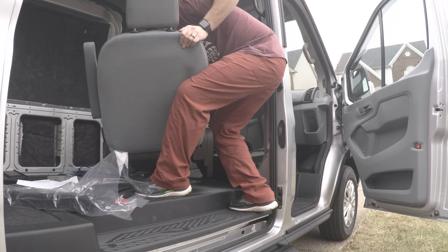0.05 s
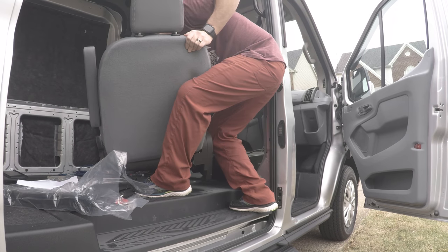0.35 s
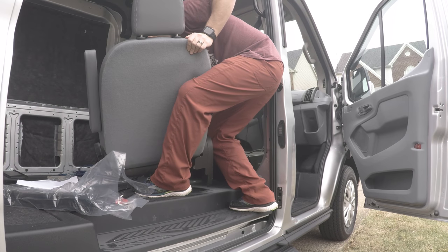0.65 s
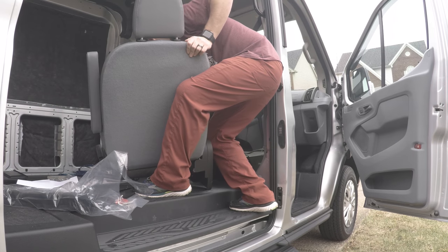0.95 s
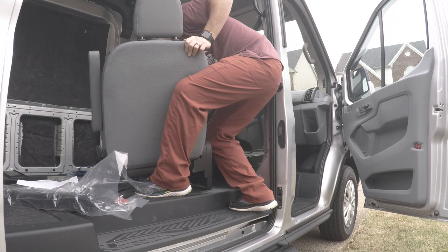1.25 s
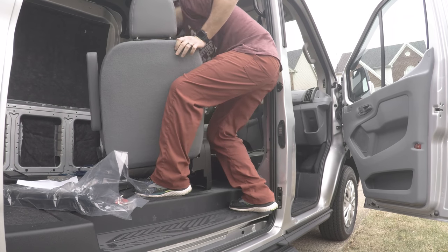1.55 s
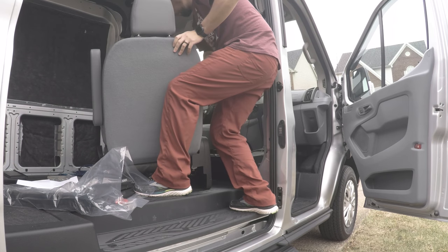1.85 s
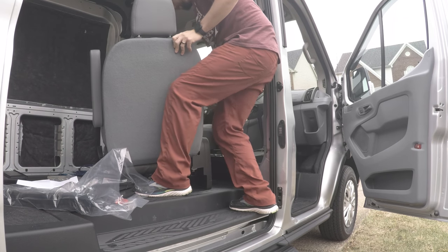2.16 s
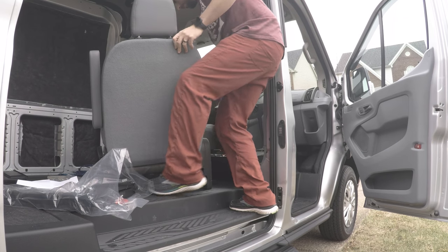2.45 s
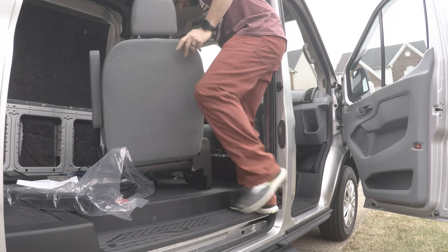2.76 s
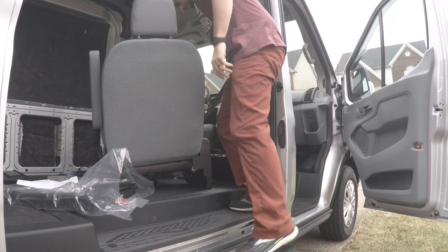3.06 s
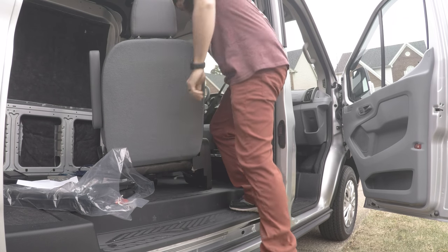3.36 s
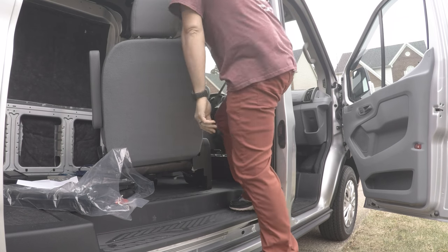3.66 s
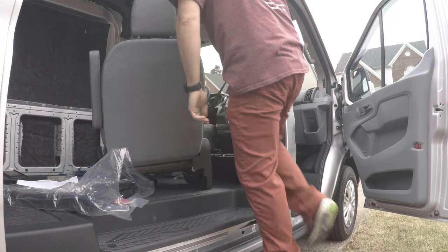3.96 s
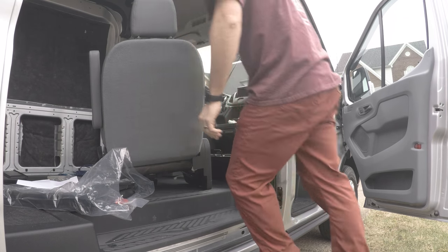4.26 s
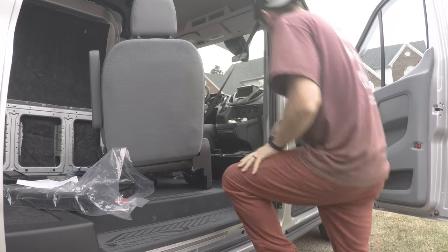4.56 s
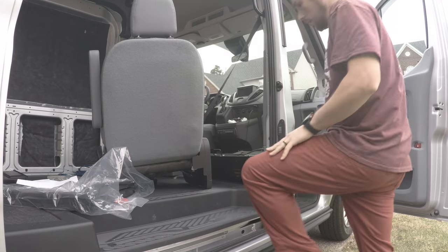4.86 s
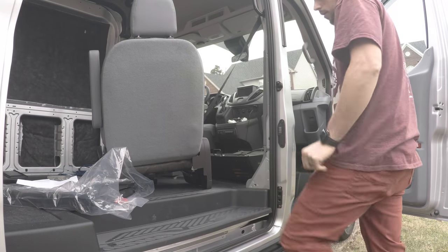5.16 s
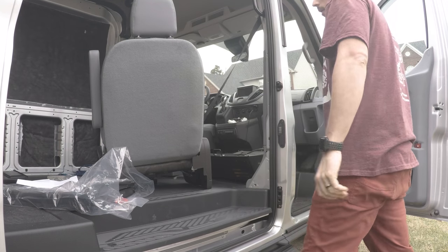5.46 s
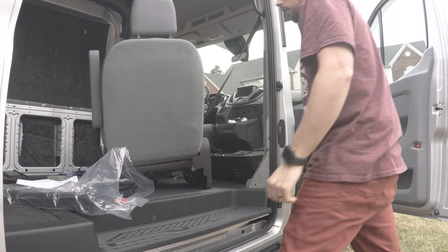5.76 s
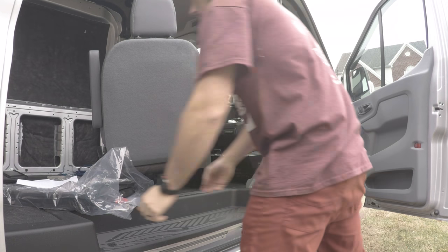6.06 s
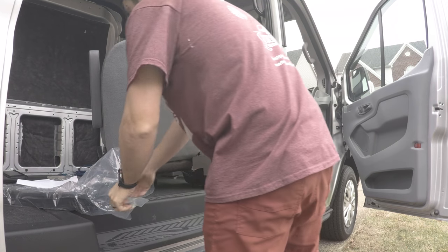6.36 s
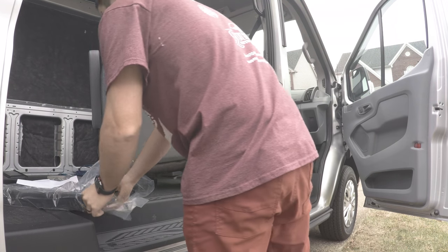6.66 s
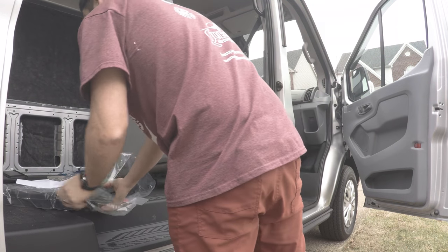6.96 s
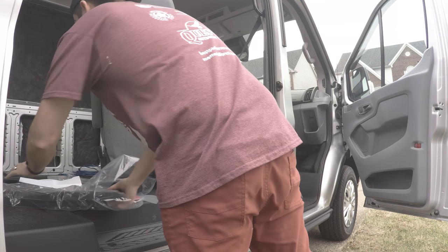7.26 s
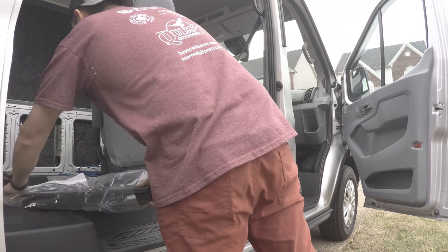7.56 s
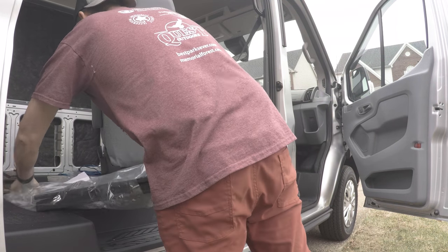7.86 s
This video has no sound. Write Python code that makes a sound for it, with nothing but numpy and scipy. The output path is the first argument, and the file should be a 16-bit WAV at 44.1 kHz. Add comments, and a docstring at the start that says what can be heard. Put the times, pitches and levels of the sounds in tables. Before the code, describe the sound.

Quiet outdoor air with a distant machine hum runs throughout, with faint bird chirps and soft rustling clothes. From about 0.4 seconds a van seat is shifted close by, giving light ticks and knocks that crowd into a short rattle near 1 second. Another knock comes around 1.6 seconds, a metal latch clinks at 2, and a small clunk follows at 2.5. At about 3.4 seconds a shoe scuffs and lands on the hollow door step with a loud double clunk. Soft footfalls and a low cabin boom follow, with a light clunk near 4.8 seconds. At 6.5 seconds a heavy part is bumped with a loud thump and clank, then slides over the ribbed floor, rumbling and scraping. From about 6.8 seconds its plastic bag crackles and snaps sharply, continuing through a second push until the end at around 8 seconds.

```python
"""Outdoor air, a distant machine's hum and rustling clothes come first, and birds begin to chirp.
In an open cargo van a man shifts a seat, which knocks and clicks as impacts excite its modes.
His foot clunks on the door step and he steps down, thumping the floor while the cabin's air booms
in resonance. He bumps a heavy part in a plastic bag and slides it inward: it rumbles over the
floor's ribs while the creases of the bag crackle and snap."""
import sys
import numpy as np
from scipy import signal
from scipy.fft import rfft, irfft
from scipy.io import wavfile
from scipy.ndimage import uniform_filter1d

SR = 44100
rng = np.random.default_rng(int(sys.argv[2]) if len(sys.argv) > 2 else 0)


def inscribe(sig):
    """Save sig as 16-bit PCM at rate SR to the path in sys.argv[1].

    A 1-D sig is mono; a 2-D sig holds one channel per row.
    Samples are clipped to [-1, 1] before scaling.
    """
    pcm = np.round(np.clip(np.atleast_2d(sig).T, -1, 1) * 32767)
    wavfile.write(sys.argv[1], SR, pcm.astype(np.int16))


N = 358091
TIME = np.arange(N) / SR
CABIN_T60_S = 0.07


def from_db(db):
    """Amplitude ratio of a level in decibels."""
    return 10 ** (np.asarray(db) / 20)


def unit_rms(x):
    """Normalisation to unit power."""
    return x / np.sqrt(np.mean(x ** 2) + 1e-20)


def at_hz(spectrum, hz):
    """Interpolation of a spectrum on a log-frequency axis."""
    points_hz, points_db = np.transpose(spectrum)
    return np.interp(np.log(hz), np.log(points_hz), points_db)


def add(out, start_s, sound):
    """Superposition: a sound joins the mix at start_s."""
    i = max(round(start_s * SR), 0)
    out[i:i + len(sound)] += sound[:max(N - i, 0)]


def decay(t60_s, t):
    """Exponential damping: 60 dB lost in t60_s."""
    return np.exp(-np.log(1000) * t / t60_s)


def drift(per_s):
    """Random modulation of unit power, interpolated between per_s values a second."""
    knots = rng.standard_normal(int(TIME[-1] * 200))
    return unit_rms(np.interp(TIME * per_s, np.arange(len(knots)), knots))


def filter_bank(count):
    """Constant-Q band-passes across the audible range, as (centre_hz, filter)."""
    edges = np.geomspace(22, 17000, count + 1)
    return [(np.sqrt(lo * hi), signal.butter(2, [lo, hi], "band", fs=SR, output="sos"))
            for lo, hi in zip(edges, edges[1:])]


def coloured(x, spectrum):
    """Minimum-phase filtering by a spectrum, falling 18 dB per octave past its ends."""
    size = 8192
    hz = np.maximum(np.arange(size // 2 + 1) * SR / size, 1)
    octaves_outside = np.abs(np.log2(hz / np.clip(hz, spectrum[0][0], spectrum[-1][0])))
    magnitude = from_db(at_hz(spectrum, hz) - 18 * np.minimum(octaves_outside, 4))
    cepstrum = irfft(np.log(magnitude))[:size // 2]
    cepstrum[1:] *= 2
    response = irfft(np.exp(rfft(cepstrum, size)))
    return signal.oaconvolve(x, response)[:len(x)]


def noise(spectrum):
    """Filtered Gaussian noise of unit power."""
    return unit_rms(coloured(rng.standard_normal(N), spectrum))


def grains(per_s, spread_db):
    """A Poisson train of impulses, mostly small with a few large."""
    sizes = from_db(spread_db * np.minimum(rng.exponential(1, N), 5)) * rng.choice([-1, 1], N)
    return sizes * (rng.random(N) < per_s / SR)


def swell(start_s, hold_s, attack_s, release_s):
    """An exponential envelope, held from start_s; it moves 20 dB per attack or release time."""
    before = np.maximum(start_s - TIME, 0) / attack_s
    after = np.maximum(TIME - start_s - hold_s, 0) / release_s
    return from_db(-20 * np.minimum(before + after, 10))


def swells(rows, attack_s):
    """Incoherent addition: overlapping envelopes sum in power."""
    return np.sqrt(sum((from_db(level_db) * swell(start_s, hold_s, attack_s, release_s)) ** 2
                       for start_s, hold_s, release_s, level_db in rows))


def scattered(from_s, to_s, count, spread_db, tilt_spread_db):
    """Jittered click timing, as (start_s, relative_db, tilt_db_per_octave)."""
    jitter, size, tilt = rng.random((count, 3)).T
    starts_s = from_s + (to_s - from_s) * (np.arange(count) + jitter) / count
    return zip(starts_s, spread_db * (2 * size - 1), tilt_spread_db * (2 * tilt - 1))


def ringing(modes, t, stretch=1):
    """Free vibration: a sum of damped modes, each of random strength and sign."""
    strengths = from_db(rng.normal(0, 1.46, len(modes))) * rng.choice([-1, 1], len(modes))
    return sum(strength * from_db(db) * np.sin(2 * np.pi * hz * t) * decay(t60_s * stretch, t)
               for strength, (hz, db, t60_s) in zip(strengths, modes))


def struck(hits, modes, rattle_db):
    """Impacts excite a small body's modes; loose contact modulates their amplitude."""
    out, t = np.zeros(N), TIME[:SR // 3]
    looseness = 1 + from_db(rattle_db) * noise([(30, 9), (250, -7), (900, -13.5)])
    for start_s, peak_db in hits:
        ring = ringing(modes, t) * looseness[round(start_s * SR):][:len(t)]
        add(out, start_s, from_db(peak_db) * ring / np.abs(ring).max())
    return out


def blows(rows, modes, clatter_db, damping, sub_db, middle_db, top_db, rise_s, lag_s):
    """Impacts excite a large body's modes and a dense panel clatter, whose treble is damped first."""
    out, t, bands = np.zeros(N), TIME[:SR * 2 // 3], filter_bank(count=13)[1:]
    median_t60_s = np.median(np.array(modes)[:, 2])
    for start_s, level_db, bass_db, tilt_db, t60_s in rows:
        spectrum = [(35, bass_db + 2 * sub_db), (70, bass_db + sub_db), (140, bass_db), (400, 0),
                    (650, tilt_db * np.log2(650 / 400) + middle_db),
                    (1100, tilt_db * np.log2(1100 / 400)),
                    (4000, tilt_db * np.log2(10)), (13000, tilt_db * np.log2(10) + top_db)]
        body = ringing(modes, t, stretch=t60_s / median_t60_s)
        onset = 1 - np.exp(-t / rise_s)
        for k, (hz, bandpass) in enumerate(bands):
            clatter = rng.standard_normal(len(t)) * decay(t60_s * (400 / hz) ** damping, t)
            band = signal.sosfilt(bandpass, (body + from_db(clatter_db) * clatter) * onset)
            peak_rms = np.sqrt(uniform_filter1d(band ** 2, SR // 40, mode="constant").max())
            gain = from_db(level_db + at_hz(spectrum, hz)) / peak_rms
            delay_s = lag_s * np.sqrt(140 / hz)   # dispersion: long bending waves arrive late
            add(out, start_s + delay_s, (-1) ** k * gain * band)
    return out


def clicks(rows, spectrum, t60_s, tail_db):
    """Brief impulses are broadband: each is a noise burst followed by the cabin's reflections."""
    out, t = np.zeros(N), TIME[:SR // 6]
    envelope = decay(t60_s, t) + from_db(tail_db) * decay(CABIN_T60_S, t)
    for start_s, peak_db, tilt_db in rows:
        tilted = [(hz, db + tilt_db * np.log2(hz / 4000)) for hz, db in spectrum]
        crack = coloured(rng.standard_normal(len(t)) * envelope, tilted)
        peak = 2 * crack[:SR // 500].std()
        add(out, start_s, from_db(peak_db) * crack / peak)
    return out


def cabin(x, wet_db):
    """Reverberation: the bare panels return a short, dense tail."""
    t = TIME[:SR // 6]
    tail = rng.standard_normal(len(t)) * decay(CABIN_T60_S, t)
    return x + from_db(wet_db) * signal.oaconvolve(x, tail / np.linalg.norm(tail))[:N]


def calls(rows, length_s, scoop_octaves, quaver, second_db):
    """Frequency modulation: each call glides, scoops and quavers, with a voice a minor third above."""
    out, progress = np.zeros(N), np.linspace(0, 1, int(length_s * SR))
    envelope = np.sqrt(np.abs(np.sin(np.pi * progress)))
    for start_s, pitch_hz, glide_octaves, level_db in rows:
        octaves = glide_octaves * (progress - .5) + scoop_octaves * (2 * progress - 1) ** 2
        hz = pitch_hz * 2 ** octaves * (1 + quaver * drift(198)[:len(progress)])
        phase = 2 * np.pi * np.cumsum(hz) / SR
        voices = np.sin(phase) + from_db(second_db) * np.sin(1.19 * phase)
        add(out, start_s, from_db(level_db) * envelope * voices)
    return out


# Suburban air: frequency_hz, density_db
AIR_SPECTRUM = [(22, -12.5), (38, 2), (50, -0.5), (68, -4), (95, -1.5), (135, -7), (250, -10.5), (400, -18),
                (1100, -20), (1400, -18.5), (2500, -28.5), (5000, -36), (8700, -60), (10000, -72),
                (15500, -54)]
# Tones of a distant machine: pitch_hz, relative_db
MACHINE_TONES = [(118.4, -63), (163, -74.5), (205, -76.5), (236.9, -71), (297, -76.5), (355, -83),
                 (709, -83.5), (1249, -82.5), (1367, -74)]


def outdoors():
    """A machine's line spectrum, wavering in level and phase, lies over broadband air noise."""
    hum = 0
    for pitch_hz, relative_db in MACHINE_TONES:
        gain = from_db(relative_db + 2.8 * drift(5.4))
        phase = 2 * np.pi * pitch_hz * TIME + .5 * drift(8.3)
        hum = hum + gain * unit_rms(np.sin(phase))
    return from_db(-57) * noise(AIR_SPECTRUM) + from_db(0.5) * hum


# Trousers and shirt brushing as the body moves: peak_s, swell_s, level_db
BRUSHES = [(0, 0.18, -63), (.83, 0.35, -63.5), (1.9, 0.058, -61.5), (4.6, 0.36, -58.5), (5.19, 0.32, -66.5),
           (6.05, 0.2, -66.5), (6.42, 0.11, -54)]
# Rubbing fabric: frequency_hz, density_db
CLOTH_SPECTRUM = [(300, 7), (1200, 2.5), (4500, -2), (6500, -6.5), (8500, -3), (10000, -12), (15500, -15)]


def cloth(rest_db=-73):
    """Friction noise: fabric gives a soft, uneven hiss that swells and fades with each move."""
    motion = sum(from_db(level_db) * swell(peak_s, 0, swell_s, swell_s)
                 for peak_s, swell_s, level_db in BRUSHES)
    return (from_db(rest_db) + motion) * noise(CLOTH_SPECTRUM) * from_db(1.6 * drift(110))


# A two-voiced bird's chirps: start_s, pitch_hz, glide_octaves, level_db
CHIRPS = [(.28, 3490, 0.34, -69), (.466, 3440, -0.4, -68.5), (1.73, 2950, .1, -71),
          (2.615, 5220, .45, -70.5), (2.682, 3250, 0.45, -66), (2.89, 2950, 0.35, -66),
          (3.09, 3870, 0.058, -71.5), (3.565, 3140, 0.038, -68.5), (3.817, 3320, .1, -69),
          (3.978, 3300, -.2, -68.5), (4.514, 3490, -0.02, -61.5), (4.69, 3800, 0.11, -61),
          (4.87, 3690, -.55, -67.5), (5.702, 3130, .55, -68), (5.9, 3200, 0.71, -67),
          (6.085, 3200, -.4, -72)]
# A second bird's nearly pure whistles: start_s, pitch_hz, glide_octaves, level_db
WHISTLES = [(1.311, 2320, -0.0023, -60), (1.44, 2100, -0.26, -71)]


def birds():
    """Two birds' gliding tones are scattered by reflection on their way into the cabin."""
    chirps = calls(CHIRPS, length_s=0.059, scoop_octaves=0.067, quaver=0.0226, second_db=-5.5)
    whistles = calls(WHISTLES, length_s=.11, scoop_octaves=0.063, quaver=.012, second_db=-19)
    return cabin(chirps + whistles, wet_db=1.5)


# Contacts of the seat's catches and trim: start_s, peak_db, tilt_db_per_octave
TICKS = [(.3626, -48, 3.5), (.4923, -48.5, -2), (.615, -36.5, 0.5), (.856, -36.5, -1), (.9313, -36, 1),
         (1.0306, -42.5, 0), (1.044, -40.5, -2), (1.4306, -45, 0), (1.6861, -39, -0.5), (1.9719, -41, 0),
         (1.9845, -46, -6), (2.4673, -40, -5), (3.2141, -39, -0.5), (3.4422, -26, -5), (3.4665, -35, -13),
         (3.6316, -42.5, -7), (6.1509, -30, -6)]
# One hard contact: frequency_hz, density_db
TICK_SPECTRUM = [(300, -36), (900, 0), (2000, 4), (4300, 8), (6500, -1), (8500, 0), (10000, -9.5),
                 (15500, -16)]


def seat_catches(rattle_db=-45):
    """Short, hard contacts radiate bright ticks, which crowd into a rattle as the seat settles."""
    contacts = scattered(from_s=.88, to_s=.965, count=12, spread_db=8, tilt_spread_db=7.5)
    rattle = [(start_s, rattle_db + db, tilt_db) for start_s, db, tilt_db in contacts]
    return clicks(TICKS + rattle, TICK_SPECTRUM, t60_s=0.0036, tail_db=-17.5)


# Knocks of the seat frame and trim: start_s, level_db, bass_db, tilt_db_per_octave, t60_s
SEAT_KNOCKS = [(.703, -50, -3, -7, 0.14), (.783, -44, 2.5, -5.5, 0.15), (.908, -46.5, 3.5, -6, 0.086),
               (.980, -50.5, 2, -5, 0.12), (1.105, -52.5, -29, -15, .28), (1.213, -58, -18, -11, .12),
               (1.618, -60.5, 22, -4, 0.19), (1.648, -56, 3, -6, .1), (2.464, -56, -2, -6, .13),
               (2.521, -55.5, -18, -7.5, 0.21), (3.258, -52.5, 7, -10, 0.13), (3.442, -37.5, -11, -8, 0.07),
               (3.449, -40.5, 3.5, -7, .06), (3.4655, -35, -2.5, -12, 0.15), (3.557, -53, -6, -5, 0.14),
               (3.818, -52.5, -2, -5, 0.18)]
# Modes of the frame, their decay rescaled by each knock: pitch_hz, relative_db, t60_s
SEAT_MODES = [(118.3, -2, 0.15), (197, -2, 0.12), (218.5, -10, 0.31), (287, -17, 0.5), (410, -6.5, 0.14),
              (477, -6, 0.13), (552, -5, 0.16), (575, -13.5, 0.18), (670, -11, 0.085), (757, -3, 0.11),
              (910, 1.5, 0.071), (1010, -10, 0.15), (1290, -10, 0.091), (1286, -6, 0.19), (1512, 1, 0.085),
              (1720, 1.5, 0.078)]


def seat_frame():
    """Impact excitation: frame and trim answer each knock with a short, clattering ring."""
    return blows(SEAT_KNOCKS, SEAT_MODES, clatter_db=18.5, damping=0.047,
                 sub_db=-35, middle_db=-2.5, top_db=-23, rise_s=0.00012, lag_s=0.0022)


# Blows on the seat's base: start_s, peak_db
BASE_HITS = [(.786, -40), (.913, -31), (.933, -44), (.948, -38), (.976, -36.5), (1.621, -39)]
# Modes of the base: pitch_hz, relative_db, t60_s
BASE_MODES = [(198, 11, 0.17), (297, 8, 0.11), (1280, -4, 0.052), (1685, -3.5, 0.12), (1820, -5, .08),
              (2240, -9, .11), (2370, -13, 0.14)]


def seat_base():
    """Shell resonance: the hollow steel base rings most strongly in its two low modes."""
    return struck(BASE_HITS, BASE_MODES, rattle_db=-12)


# Blows on the latch: start_s, peak_db
LATCH_HITS = [(1.9719, -35), (1.9845, -39)]
# Modes of the latch: pitch_hz, relative_db, t60_s
LATCH_MODES = [(1730, -8, 0.11), (2490, 0, .06), (2680, 1, 0.052), (3500, -7.5, 0.15), (3700, -6, .075),
               (4940, -11, 0.12), (5090, 0, 0.065), (5625, -9, 0.076), (6350, -7, 0.11), (7273, -8, 0.073),
               (8470, -11, 0.084), (11300, -15, .05)]


def latch():
    """A small, stiff body has high natural frequencies, so the steel latch clinks."""
    return struck(LATCH_HITS, LATCH_MODES, rattle_db=1)


# Blows on the door step: start_s, peak_db
STEP_HITS = [(2.467, -40.5), (3.4425, -23), (3.4665, -24.5), (3.824, -41), (4.843, -37)]
# Modes of the step: pitch_hz, relative_db, t60_s
STEP_MODES = [(630, 7, 0.024), (725, 7, 0.039), (827, 6.5, 0.025), (946, -2.5, 0.058), (977, 1.5, 0.039),
              (1170, -4, 0.045)]


def door_step():
    """Heavy damping cuts the ring of the hollow plastic step to a clunk underfoot."""
    return struck(STEP_HITS, STEP_MODES, rattle_db=-10)


# Shifts of the man's weight: start_s, hold_s, release_s, level_db
SWAYS = [(3.05, .3, .2, -61), (3.47, .03, 0.37, -45.5), (4.11, .02, 0.21, -56.5), (4.43, 0.28, .2, -54.5),
         (4.78, 0.21, 0.59, -46), (5.55, 0.24, 0.31, -47.5), (6.1, 0.046, .08, -49), (6.56, 0.14, 0.4, -40),
         (7.26, .1, 1, -49.5)]


def cabin_boom():
    """Cavity resonance: shifting weight drives the cabin's lowest air mode, whose pitch wanders."""
    pitch_hz = np.interp(TIME, [4.2, 4.9, 5.9, 6.45, 6.65], [70, 81, 82, 80.4, 67.4]) + 5 * drift(30)
    phase = 2 * np.pi * np.cumsum(pitch_hz) / SR
    return unit_rms(np.sin(phase)) * swells(SWAYS, attack_s=0.14)


# Envelope of a shoe sole's scuff: time_s, level_db
SCUFF_LEVELS = [(3.41, -80), (3.428, -50), (3.438, -34.5), (3.443, -50), (3.45, -66)]
# The sole's friction: frequency_hz, density_db
SCUFF_SPECTRUM = [(300, 5), (1000, 4), (2000, -8), (4000, -18), (8500, -28), (14000, -33)]


def sole_scuff():
    """Sliding friction: a shoe sole scuffs just before the loudest clunk."""
    times_s, levels_db = np.transpose(SCUFF_LEVELS)
    envelope = from_db(np.interp(TIME, times_s, levels_db, left=-150, right=-150))
    return envelope * noise(SCUFF_SPECTRUM)


# Feet and load landing on the floor: start_s, level_db, bass_db, tilt_db_per_octave, t60_s
FLOOR_THUMPS = [(4.275, -65, 12, -3.5, .12), (4.840, -63.5, 18.5, -4.5, 0.23), (5.372, -61.5, -8, -6, .13),
                (5.896, -51.5, 4.5, -6, 0.32), (6.030, -61.5, 13.5, -5.5, 0.38), (6.305, -53, 5, -7, 0.26),
                (6.528, -33, -0.5, -20, 0.16), (6.537, -37.5, 11, -5.5, 0.4), (6.585, -41.5, -2, -5, 0.25),
                (7.081, -54, 12, -4, 0.58), (7.186, -45, 10, -4.5, 0.092), (7.266, -55, 20, -1, 0.25),
                (7.431, -42, 1.5, -9.5, 0.28)]
# Modes of the floor, their decay rescaled by each excitation: pitch_hz, relative_db, t60_s
FLOOR_MODES = [(65.3, -15, 0.81), (91.3, -2, 0.56), (115.6, 0, 0.41), (132.2, 0.5, 0.19), (170, -2, 0.39),
               (198, -0.5, 0.15), (268.6, -0.5, 0.25), (311, -2.5, 0.46), (342, 4.5, 0.19),
               (424, -0.5, 0.2), (469.5, -8.5, 0.38), (586, -12.5, 0.15), (860, -9, 0.13), (1370, -5, 0.31)]


def van_floor():
    """Plate vibration: heavy impacts excite the floor's low bending modes."""
    return blows(FLOOR_THUMPS, FLOOR_MODES, clatter_db=15.5, damping=0.23,
                 sub_db=-15, middle_db=-5, top_db=-18, rise_s=0.00033, lag_s=0.0014)


# Bumps of the part inside the bag: start_s, peak_db
PART_HITS = [(6.535, -29.5), (6.548, -36), (6.645, -34), (7.183, -39)]
# Modes of the part: pitch_hz, relative_db, t60_s
PART_MODES = [(1220, 0, 0.13), (1340, 2, 0.17), (1395, 5, 0.11), (1580, -8, 0.12), (1900, -25, .1),
              (2310, -1, 0.052), (2460, -21, .1)]


def heavy_part():
    """Inharmonic modes make the hard part clank when it is bumped."""
    return struck(PART_HITS, PART_MODES, rattle_db=-5)


# Pushes that slide the load: start_s, length_s, rumble_db, jolt_s
PUSHES = [(6.55, 0.4, -44, 0.15), (7.026, 0.033, -49, 0.0034), (7.195, 0.873, -39.5, 0.023)]
# Judder over the floor's ribs: frequency_hz, gain_db
RUMBLE_SPECTRUM = [(45, -15), (70, -11.5), (130, 6.5), (230, 1.5), (350, 2.5), (480, -2), (700, -23.5),
                   (1500, -46.5)]
# Grit under the load: frequency_hz, gain_db
SCRAPE_SPECTRUM = [(300, -19), (560, -1.5), (750, 2), (980, -0.5), (1400, -3), (2200, -11.5), (4000, -17),
                   (9000, -31.5)]


def sliding_load(jolt_db=12, sag_db_per_s=5.5, scrape_db=-50, scrape_jolt_db=4):
    """Forced vibration: the load judders over the ribs and rings the floor, while grit scrapes."""
    rumble_gain = scrape_gain = 0
    for start_s, length_s, rumble_db, jolt_s in PUSHES:
        moving = swell(start_s, length_s, attack_s=0.011, release_s=0.082)
        elapsed_s = np.maximum(TIME - start_s, 0)
        jolt = np.exp(-elapsed_s / jolt_s)   # the load shudders as it breaks loose
        rumble_gain += moving * from_db(rumble_db + jolt_db * jolt - sag_db_per_s * elapsed_s)
        scrape_gain += moving * from_db(scrape_db + scrape_jolt_db * jolt)
    judder = grains(per_s=450, spread_db=2.5)
    floor_response = ringing(FLOOR_MODES, TIME[:SR // 2], stretch=0.65)
    floor_ring = unit_rms(signal.oaconvolve(judder, floor_response)[:N])
    rumble = unit_rms(coloured(judder, RUMBLE_SPECTRUM)) + from_db(-8.5) * floor_ring
    grit = cabin(grains(per_s=1800, spread_db=3), wet_db=-3.5)
    scrape = coloured(grit, SCRAPE_SPECTRUM)
    return rumble_gain * unit_rms(rumble) + scrape_gain * unit_rms(scrape)


# Handfuls of the bag being crumpled: start_s, hold_s, release_s, level_db
GRABS = [(6.785, 0.12, 0.057, -44), (7.03, .02, 0.18, -53.5), (7.3, 0.38, 0.12, -50.5),
         (7.53, 0.035, 0.14, -41), (7.62, 0.15, 0.9, -47.5), (8.0, 0.019, 0.54, -42.5)]
# The largest folds snapping: start_s, peak_db, tilt_db_per_octave
SNAPS = [(6.78, -31.5, 0), (6.8473, -28.5, 2), (6.9192, -27.5, -3.5), (6.9607, -38.5, 2.5),
         (7.031, -26.5, -0.5), (7.0409, -28, -1), (7.0673, -28.5, 0), (7.232, -39.5, 4), (7.431, -33.5, 10),
         (7.5225, -28.5, -4), (7.7805, -27.5, 10), (7.8334, -28.5, 3.5), (7.886, -32, 7), (7.8943, -25, 9),
         (7.8999, -23.5, 2.5), (7.983, -30, 2), (8.0606, -29.5, 7), (8.1134, -27, 2.5)]
# Crackling plastic film: frequency_hz, gain_db
BAG_SPECTRUM = [(500, -3), (1500, 3), (3800, 0.5), (6500, -4), (8500, -1.5), (10000, -13), (13000, -11.5),
                (15500, -22)]


def bag(small_snap_db=5.5):
    """Buckling of thin film: creases crackle in clumps and folds snap, harder under a firmer grip."""
    grip = swells(GRABS, attack_s=0.045)
    clumps = from_db(2.25 * drift(110))
    broadband = grains(per_s=870, spread_db=1.5)
    creases = 0
    for k, (_, bandpass) in enumerate(filter_bank(count=18)[9:]):
        flurry = from_db(1.1 * drift(55))   # each patch of film has its own timing and register
        impulses = (-1) ** k * broadband + grains(per_s=1200, spread_db=3.5)
        creases += signal.sosfilt(bandpass, impulses * flurry)
    crackle = unit_rms(coloured(cabin(creases * clumps, wet_db=-8), BAG_SPECTRUM))
    folds = scattered(from_s=GRABS[0][0], to_s=TIME[-1], count=60, spread_db=4, tilt_spread_db=4)
    small_snaps = [(start_s, small_snap_db + db + 20 * np.log10(np.interp(start_s, TIME, grip)), tilt)
                   for start_s, db, tilt in folds]
    return grip * crackle + clicks(SNAPS + small_snaps, BAG_SPECTRUM, t60_s=0.011, tail_db=-15)


def scene():
    """Superposition: every sound of van and street is summed and plays alike in both channels."""
    ringing_parts = seat_base() + door_step() + heavy_part()
    contacts = seat_frame() + sole_scuff() + latch() + seat_catches()
    loading = van_floor() + cabin_boom() + sliding_load() + bag()
    sound = ringing_parts + contacts + loading + cloth() + birds() + outdoors()
    return np.array([sound, sound])


# Microphone self-noise: frequency_hz, density_db
MIC_SPECTRUM = [(25, 8), (100, -7.5), (700, -2.5), (3000, 0), (6000, 2.5), (8600, 1.5), (10000, 0),
                (15000, 0), (15700, -19)]


def record(dry, hiss_db=-67.5, cutoff_hz=15700):
    """Each microphone adds uncorrelated self-noise, and a steep low-pass limits the bandwidth."""
    hiss = from_db(hiss_db) * np.array([noise(MIC_SPECTRUM), noise(MIC_SPECTRUM)])
    lowpass = signal.ellip(10, .1, 80, cutoff_hz, fs=SR, output="sos")
    return signal.sosfilt(lowpass, dry + hiss)


dry = scene()
out = record(dry)
inscribe(out)
```